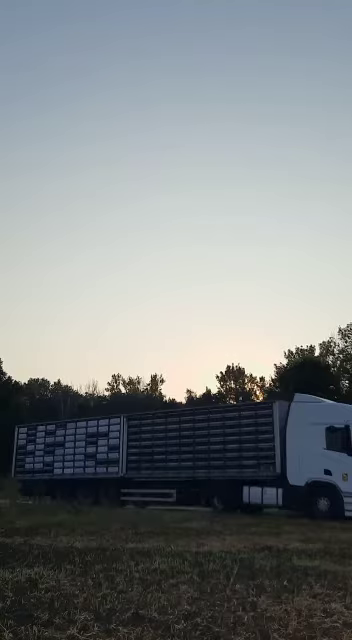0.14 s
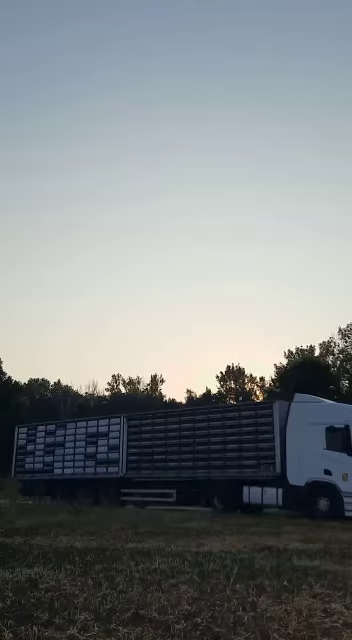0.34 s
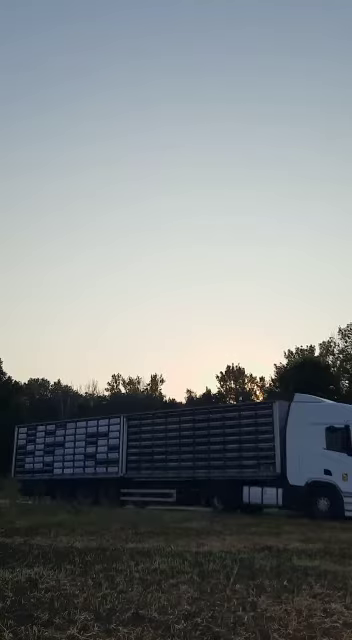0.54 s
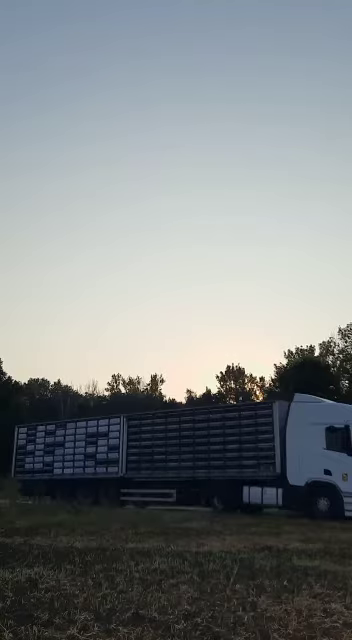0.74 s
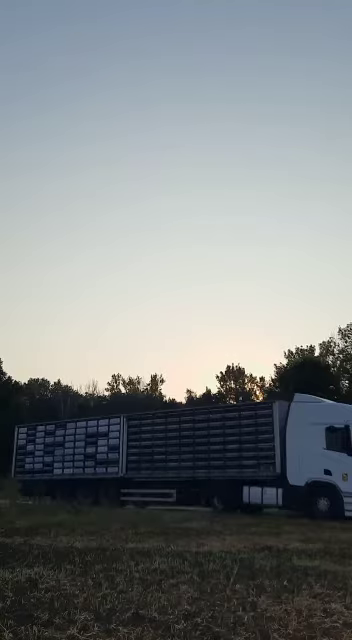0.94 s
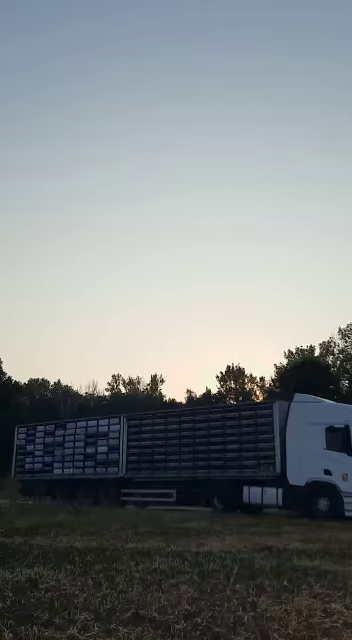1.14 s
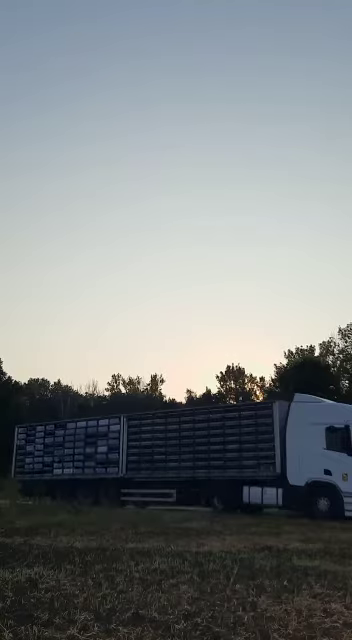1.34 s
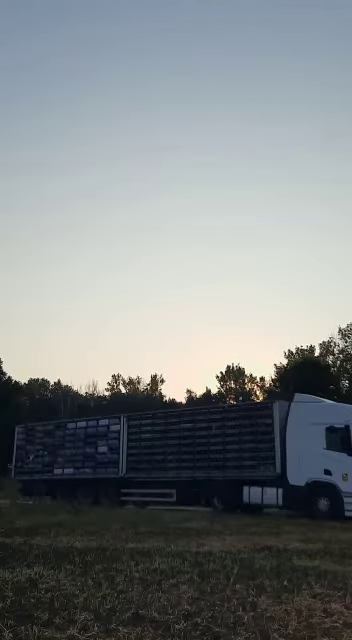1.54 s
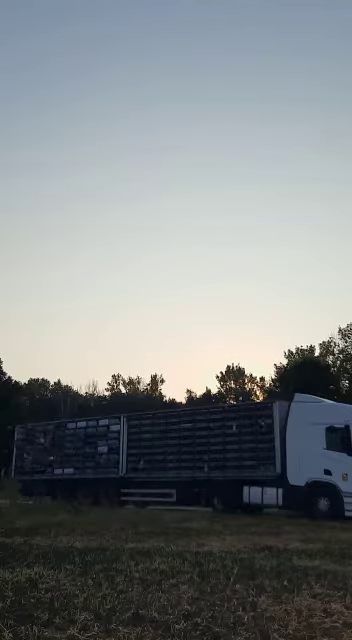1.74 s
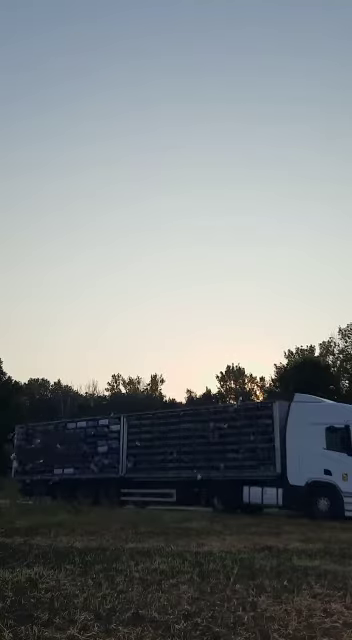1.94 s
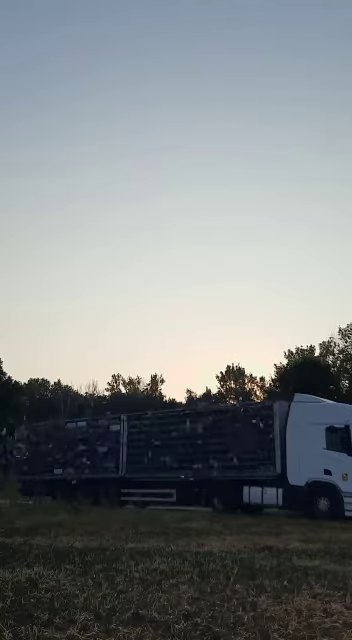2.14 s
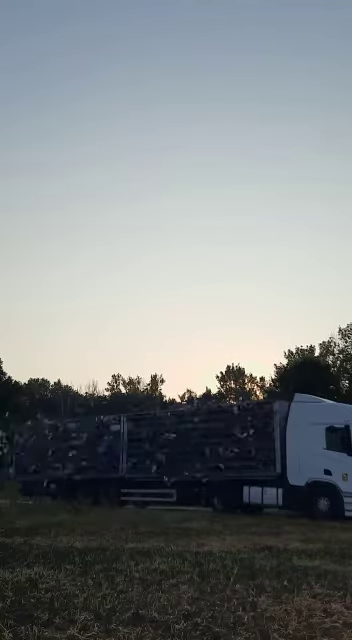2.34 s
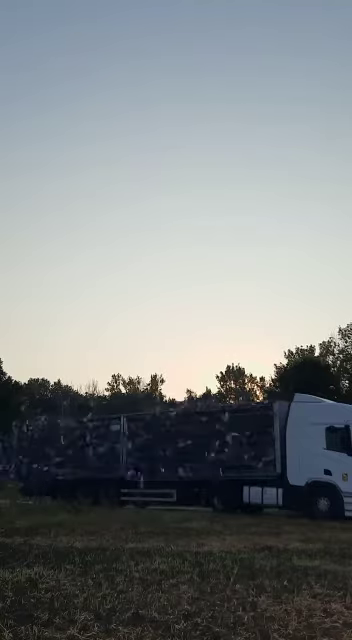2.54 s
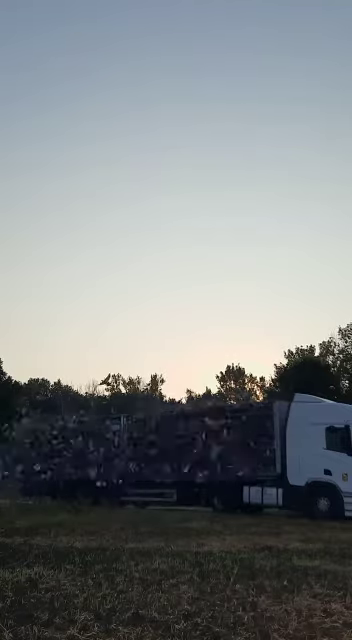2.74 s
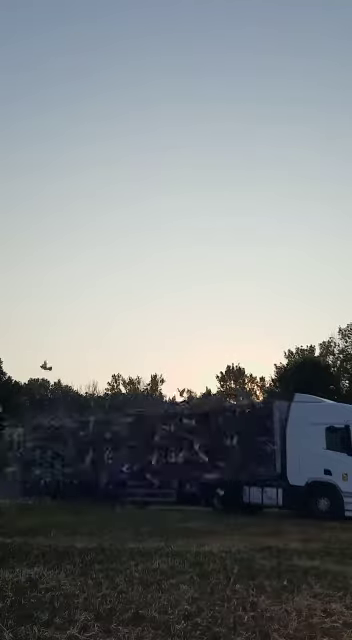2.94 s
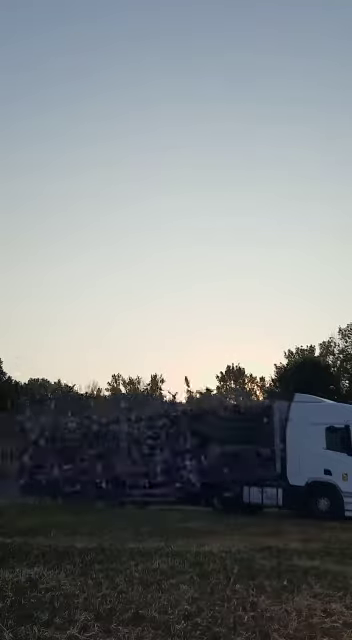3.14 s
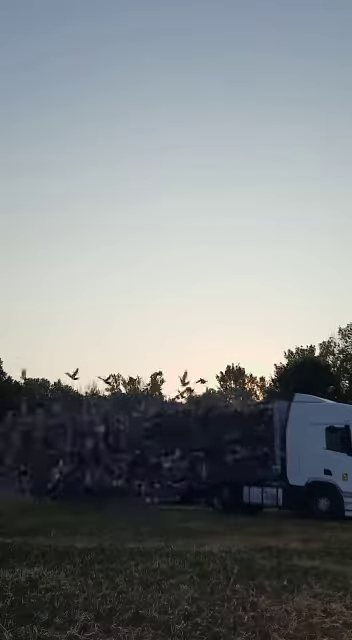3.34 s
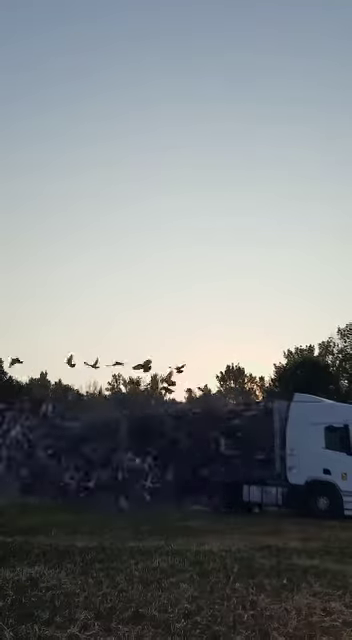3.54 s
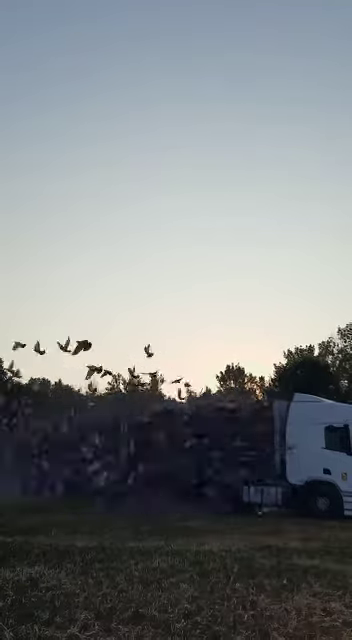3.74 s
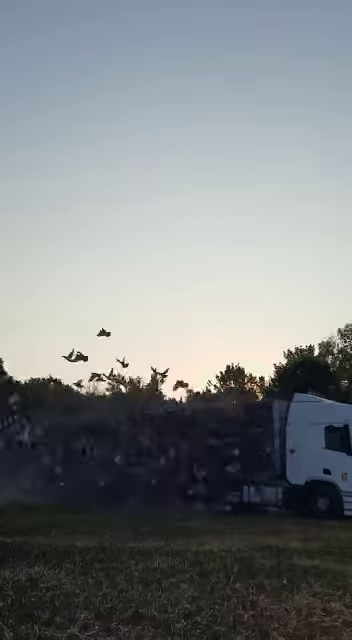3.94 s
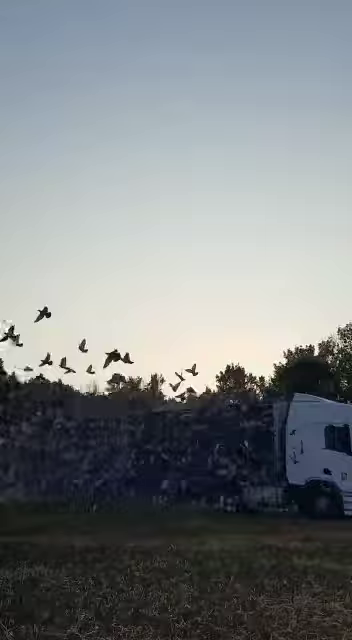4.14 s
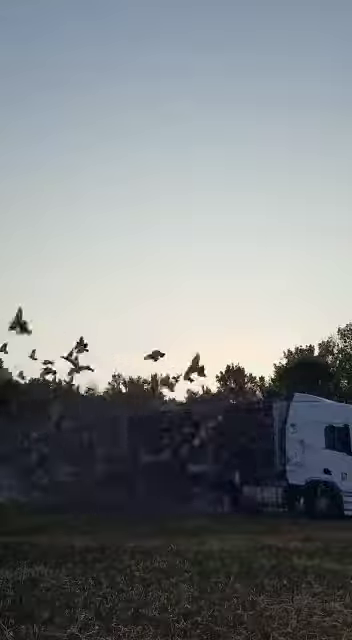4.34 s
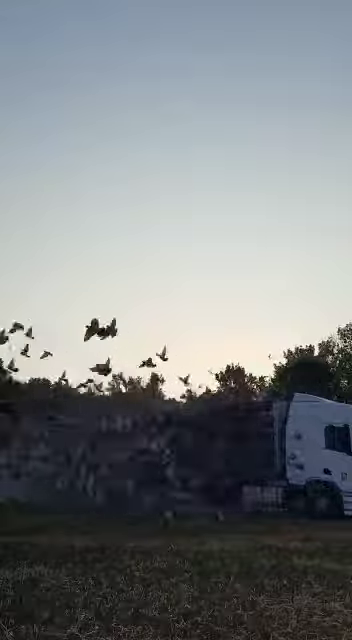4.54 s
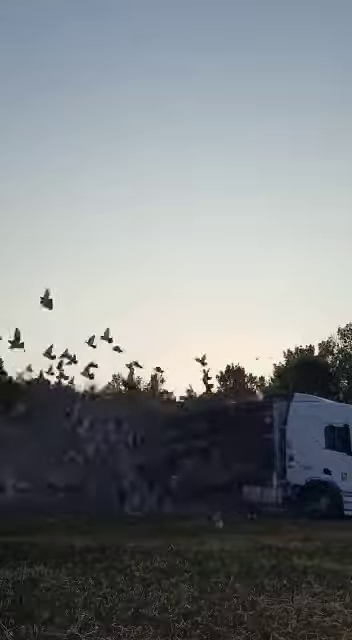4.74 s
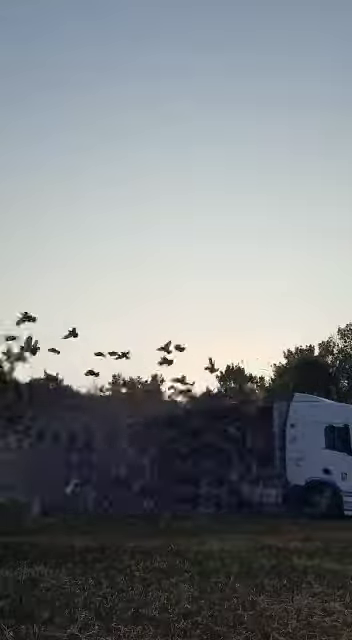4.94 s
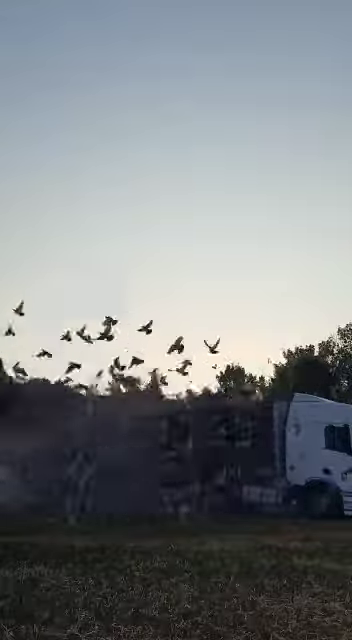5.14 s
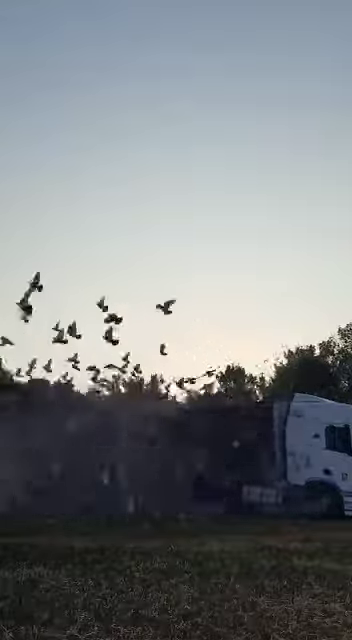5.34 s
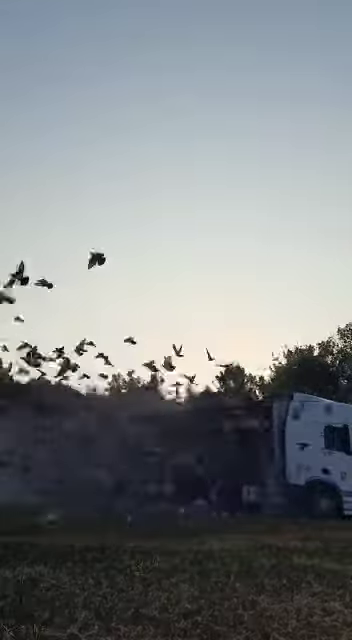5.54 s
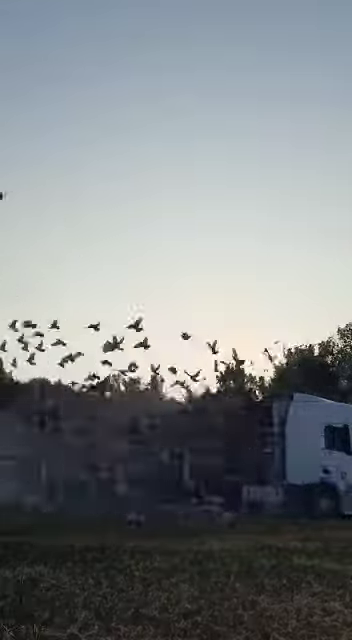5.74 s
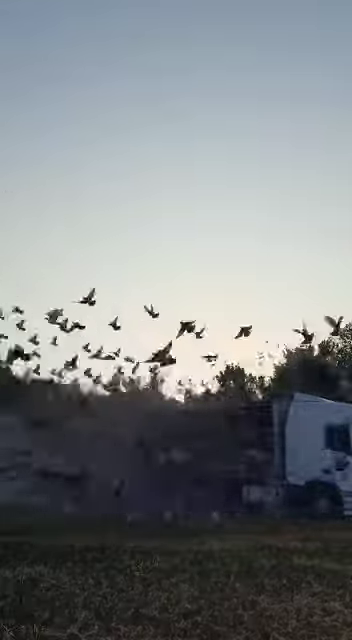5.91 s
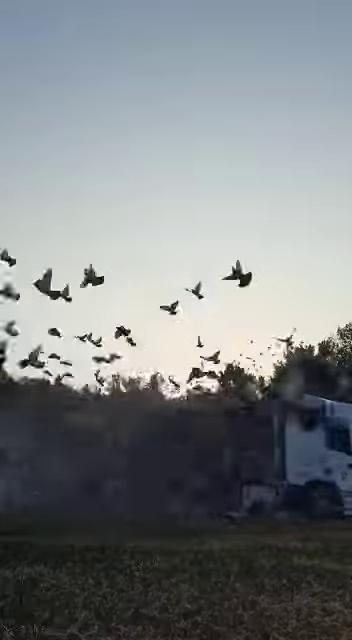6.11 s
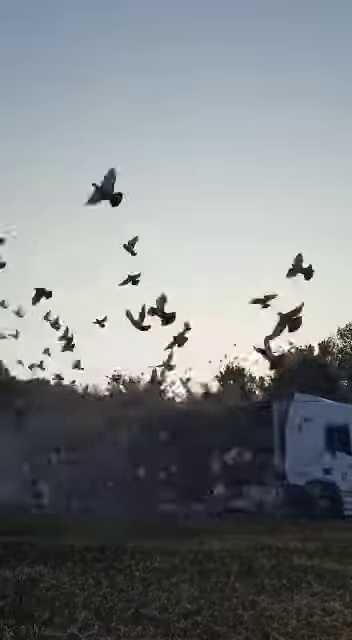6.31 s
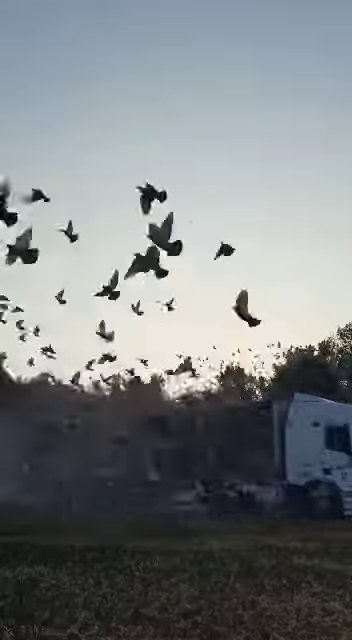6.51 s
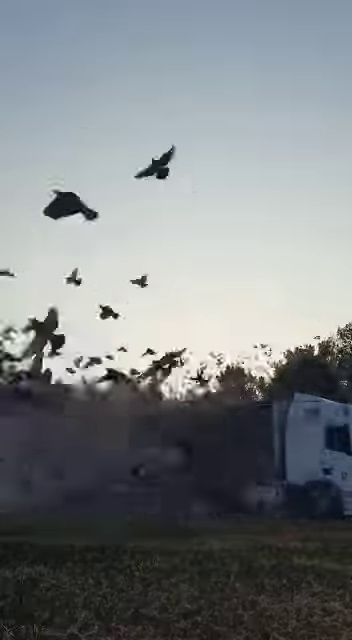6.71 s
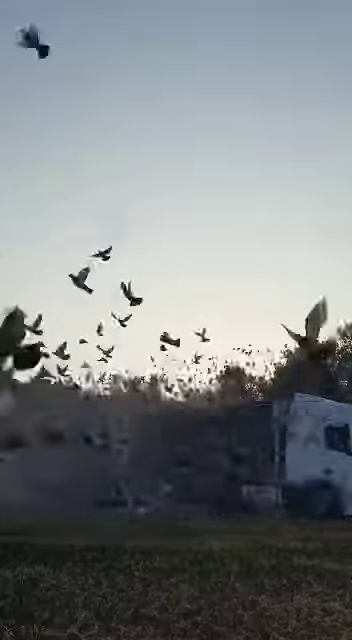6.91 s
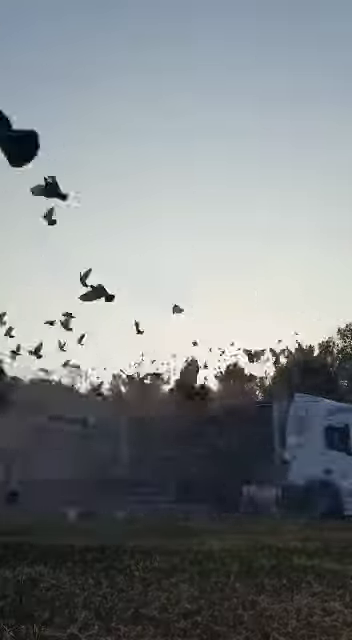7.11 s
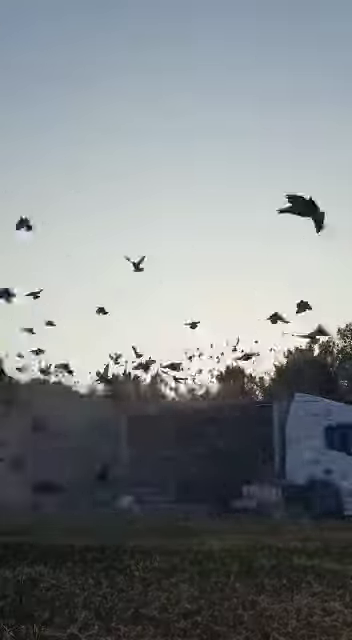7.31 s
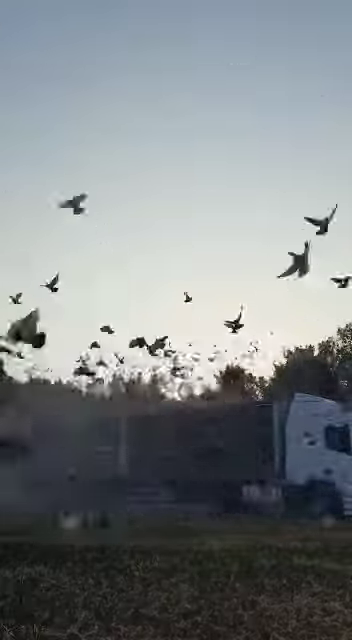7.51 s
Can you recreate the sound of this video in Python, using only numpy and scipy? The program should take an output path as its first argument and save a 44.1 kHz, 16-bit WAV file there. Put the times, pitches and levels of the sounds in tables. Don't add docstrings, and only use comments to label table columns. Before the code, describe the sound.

Thousands of pigeons burst from truck crates in an open field, clattering plastic doors giving way to a dense, rushing roar of wingbeats.

```python
import sys
import numpy as np
from scipy import signal
from scipy.fft import rfft, irfft, next_fast_len
from scipy.io import wavfile
from scipy.ndimage import uniform_filter1d

SR = 44100
rng = np.random.default_rng(int(sys.argv[2]) if len(sys.argv) > 2 else 0)


def materialize(psi):
    bounded = np.clip(np.atleast_2d(psi).T, -1, 1)
    quanta = np.round(bounded * 32767).astype(np.int16)
    wavfile.write(sys.argv[1], SR, quanta)


def voltage_ratio(decibels):
    exponent = np.asarray(decibels, float) / 20
    return 10 ** exponent


N = 338114

# (time [s], wing noise level [dB], closeness of the air push [dB])
FLOCK_PATH = [(0.0, -67, -4), (0.25, -67.5, -4), (0.72, -63.5, -4), (0.9, -59, -5), (1.15, -54, -5),
              (1.51, -46, -4), (1.67, -43, -6.5), (1.9, -42.5, -2.5), (2.05, -38, -3.5), (2.54, -38, -1),
              (3.27, -37, -.5), (4.23, -37.5, 0), (4.55, -39, 2.5), (5.3, -39, 1.5), (6.13, -40.5, 1.5),
              (6.9, -42.5, 0.5), (7.37, -44, 0), (7.67, -44.5, 3.5)]
# (frequency [Hz], level per Hz [dB])
THUMP_COLOUR = [(24, -62), (36, -24), (55, -1), (85, -1), (150, -5.5), (200, -11), (250, -22), (400, -43.5)]
FAR_THUMP_COLOUR = [(40, -40), (70, -8), (120, -0.5), (170, 5.5), (210, -4.5), (260, -9), (400, -47)]
DOWNWASH_COLOUR = [(120, -3), (190, -9.5), (250, -5.5), (310, 0.5), (420, -7), (600, -7), (1000, -63)]
WHOOSH_COLOUR = [(250, -50), (400, -5), (520, -3.5), (800, 0.5), (1300, -3.5), (2200, -9), (3500, -17),
                 (7000, -23)]
RUSTLE_COLOUR = [(700, -9), (2000, 2.5), (4000, 1.5), (8000, -1), (16000, -3)]
# (time [s], peak level [dB])
NEAR_SWEEPS = [(1.267, -35), (1.4326, -40), (1.5998, -33), (1.9215, -22.5), (2.0494, -31), (2.11, -28),
               (2.134, -19.5), (2.1994, -29), (2.3594, -25), (2.4538, -33), (3.0604, -25), (4.1994, -29),
               (5.0794, -25), (6.1994, -29), (6.4394, -30), (6.6403, -23.5)]
# (frequency [Hz], level per Hz [dB])
SWEEP_COLOUR = [(500, -7), (1000, -4), (1800, -5), (3000, -5), (5000, -20), (9000, -19)]
# (time [s], peak level [dB], low body re peak [dB], top re peak [dB])
CRATE_STRIKES = [(0.278, -43, 1, -24), (0.3436, -42.5, -3, -14), (0.4768, -48, -1, -10),
                 (0.579, -49, 1, -7), (0.8938, -42.5, 2, -8), (0.929, -43, -5, -11), (1.0405, -49, -2, 3),
                 (1.09, -43, 9, -14), (1.1598, -40, 2, -13), (1.268, -35.5, 2, -7),
                 (1.3213, -36.5, 8.5, -14), (1.372, -30, -14, -21), (1.4924, -29, -3, -14),
                 (1.6008, -22.5, -12, -14), (1.6925, -28, 2, -14), (1.802, -31, 2, -12),
                 (1.847, -29, -8, -13), (1.9222, -22.5, 1, -10), (2.0343, -25, -8, -6),
                 (2.053, -17.5, -8, -13), (2.136, -24, 2, -6), (2.361, -22, -8, -16),
                 (2.4258, -24.5, 9, -6), (2.4528, -23, 8, -7), (2.5805, -29.5, -9, -2),
                 (2.604, -27, -11, -11), (2.6407, -21, -3, -6.5)]
# (time [s], peak level [dB], low body re peak [dB])
OPEN_CLAPS = [(2.9854, -25, -1), (3.2786, -19.5, -19), (3.4097, -27, -8), (3.8931, -19, -11),
              (4.3575, -30, -10), (4.43, -26, -9), (4.504, -24, 3), (4.6763, -28, -7), (4.8498, -24, 2),
              (5.045, -22, 2), (5.153, -22.5, -5), (5.2703, -18.5, -14), (5.2937, -24, -3), (5.577, -27, 0),
              (5.7834, -28, -6), (5.965, -24.5, -8), (6.0317, -26, -12), (6.2537, -27, 1),
              (6.3475, -34, -9), (6.3774, -34, 1), (6.4373, -27, 4), (6.6386, -22, -6), (6.8728, -34, -8),
              (6.9176, -22, -8), (7.1232, -34, -5), (7.4859, -34, -8)]
# (frequency [Hz], level per Hz [dB])
CRACK_COLOUR = [(1200, -24), (2500, 1), (5000, -3), (8000, 0.5), (9000, 1.5), (10000, -40)]
TICK_COLOUR = [(8500, -40), (9700, 4.5), (13000, 1.5), (16000, -10)]
# (time [s], peak level [dB], pitch [Hz], decay by 60 dB [s])
DOOR_KNOCKS = [(1.076, -45, 754, .02), (1.2675, -29, 765, 0.021), (1.421, -34, 670, .02),
               (1.6006, -24, 800, 0.0063), (1.67, -33, 756, .02), (1.9223, -27, 750, 0.0084),
               (2.035, -24, 1090, .02), (2.102, -30, 905, .02), (2.113, -25, 1070, 0.022),
               (2.15, -28, 990, 0.022), (2.135, -19, 910, .012), (2.415, -21, 1050, 0.013),
               (2.454, -17.5, 930, 0.022), (2.729, -20.5, 990, 0.015), (3.16, -28, 770, .019)]
# (frequency [Hz], level per Hz [dB])
ROAD_COLOUR = [(25, -50), (42, -24), (53, -12), (64, -15), (110, -10), (180, -16), (257, -27), (383, -29.5),
               (604, -16.5), (1000, -17), (1630, -23), (3180, -40.5), (5010, -49), (15000, -57)]
# (frequency [Hz], left over right [dB])
PORT_BALANCE = [(190, 0.8), (450, 5), (1200, 2), (3500, 1.3), (5500, -2.5), (8000, -3.5), (9000, 5.5),
                (10500, 4), (14500, -0.5)]
# (frequency [Hz], likeness [0-1])
PORT_LIKENESS = [(200, 0.99), (500, 0.97), (1200, 0.83), (2200, 0.62), (3500, 0.34), (5500, 0.26),
                 (8000, 0.35), (8600, .2), (9100, 1), (9500, 1), (10000, 0), (15000, 0)]
# (frequency [Hz], lead of the left [rad])
PORT_LEAD = [(0, 0), (340, 0.0), (950, -0.8), (2840, -2.5), (6370, -4.0), (7580, -4.5), (8010, -5),
             (8960, -4), (9560, -11.5), (13900, -2.5), (15400, -21)]
# (frequency [Hz], level [dB])
OVERALL_COLOUR = [(4500, 0.5), (6500, 3), (7900, 6), (8500, 2), (9000, -6), (9550, -4.5), (9750, -7.5),
                  (12000, -1), (15500, -3.5)]
# (time [s], limit [Hz])
TREBLE_LIMIT = [(0, 13300), (.9, 14300), (1.8, 14200), (2.8, 15300), (3.6, 15470), (7.7, 16400)]
# (frequency [Hz], share of time in the sum [0-1], in the difference [0-1])
MUTED_BANDS = [(2480, .002, .001), (3370, .05, .002), (4270, 0.14, .003), (5640, .08, .003),
               (6500, .004, .003), (8440, .02, 0.028), (9360, .66, 1), (9900, .03, 0.16),
               (11850, .004, .01), (13300, .04, .03), (14200, .2, .1), (15500, .4, .25)]


def flock():
    t = np.arange(N) / SR
    wing_db, near_db = wings(t)
    mass_db = wing_db + 0.26 * t
    rustle = voltage_ratio(wing_db + 4.0)
    thump = voltage_ratio(mass_db + 5 + near_db)
    downwash = voltage_ratio(mass_db - 1.5 + 0.8 * near_db)
    whoosh = voltage_ratio(mass_db + 5 - 0.057 * near_db)

    beat = strokes(count=14)
    snap = snaps(per_s=300, spread_db=6.3, ms=0.6)
    slap = snaps(per_s=150, spread_db=4.8, ms=4.1)

    def mix(near, snappy, snap=slap):
        far = np.clip(1 - near - snappy, 0, 1)
        return np.sqrt(abs(far + near * beat + snappy * snap))

    airborne = np.clip((t - 0.55) / 0.6, 0, 1)
    close = np.clip((t - 1.1) / 1.64, 0, 1)
    feather_share = np.clip(0.16 - 0.0043 * t, 0, 1)
    return (air(airborne * np.sqrt(close) * thump * mix(0.17, 0.014, snap), THUMP_COLOUR)
            + air(voltage_ratio(-0.5) * airborne * np.sqrt(1 - close) * thump, FAR_THUMP_COLOUR)
            + air(airborne * downwash * mix(0.1, 0.034), DOWNWASH_COLOUR)
            + air(airborne * whoosh * mix(0.32, 0.054), WHOOSH_COLOUR)
            + air(rustle * mix(0.23, feather_share, snap), RUSTLE_COLOUR))


def wings(t):
    s, wing_db, near_db = np.transpose(FLOCK_PATH)
    return np.interp(t, s, wing_db), np.interp(t, s, near_db)


def strokes(count, beat_hz=9.0, sharp=3.9, near_db=4.0):
    step = 64
    t = np.arange(0, N, step) / SR
    power = np.zeros(len(t))
    for _ in range(count):
        pace_hz = beat_hz * rng.uniform(0.8, 1.2) * (1 + 0.0737 * drift(1.495, t))
        turns = np.cumsum(pace_hz) * step / SR + rng.random()
        nearness = voltage_ratio(near_db * drift(0.79, t)) ** 2
        power += nearness * np.exp(sharp * np.cos(2 * np.pi * turns))
    power /= uniform_filter1d(power, 400)
    return np.interp(np.arange(N) / SR, t, power)


def snaps(per_s, spread_db, ms):
    size = voltage_ratio(spread_db * np.minimum(rng.exponential(1, N), 3.3)) ** 2
    size = size * (rng.random(N) < per_s / SR)
    fade = np.exp(-np.arange(800) / SR * 1000 / ms)
    power = signal.oaconvolve(size, fade)[:N]
    return power / power.mean()


def sweeps():
    envelope = np.zeros(N)
    ms = np.arange(6000) / SR * 1000
    swell = (1 - np.exp(-ms / 0.81)) * np.exp(-ms / 14.3)
    for s, db in NEAR_SWEEPS:
        at = round(s * SR)
        envelope[at:at + len(ms)] += voltage_ratio(db) * swell
    return air(voltage_ratio(-4.0) * envelope, SWEEP_COLOUR)


def claps():
    top_db = -23
    events = list(map(tuple, CRATE_STRIKES))
    events += [tuple(row) + (top_db,) for row in OPEN_CLAPS]
    events += faint_claps(26, top_db)
    bursts = np.zeros((3, N))
    ms = np.arange(1300) / SR * 1000
    fade = np.exp(-ms * np.array([[-0.03], [0.01], [0.15]]))
    shape = (1 - np.exp(-ms / 0.1)) * np.exp(-ms / 1.76) * fade
    for s, db, body_db, tick_db in events:
        at = round(s * SR)
        gains = voltage_ratio(db + np.array([[body_db], [0], [tick_db]]))
        bursts[:, at:at + len(ms)] += gains * shape[:, :N - at]
    puff, crack, tick = bursts
    return (air(voltage_ratio(-4.5) * puff, WHOOSH_COLOUR)
            + air(voltage_ratio(-2.5) * crack, CRACK_COLOUR)
            + air(voltage_ratio(9.0) * tick, TICK_COLOUR))


def faint_claps(count, top_db):
    s = rng.random(count) * (N / SR)
    luck = rng.standard_normal((count, 2))
    db = wings(s)[0] + 8 + 1.5 * luck[:, 0]
    body_db = -5 + 2 * luck[:, 1]
    return list(zip(s, db, body_db, np.full(count, top_db)))


def knocks():
    out = np.zeros(N)
    t = np.arange(3000) / SR
    onset = 1 - np.exp(-t / 0.00036)
    for s, db, hz, t60 in DOOR_KNOCKS:
        ring = np.sin(2 * np.pi * hz * t) + 0.25 * np.sin(2 * np.pi * 1.03 * hz * t)
        decay = voltage_ratio(db + 1.5 - 60 * t / max(t60, 0.004))
        at = round(s * SR)
        out[at:at + len(t)] -= decay * ring * onset
    return np.array([out, np.roll(out, 9)])


def echoed(x):
    delay_ms, echo_db = 2.7, -5.5
    return x + voltage_ratio(echo_db) * np.roll(x, round(delay_ms * SR / 1000), axis=-1)


def road():
    t = np.arange(N) / SR
    hum_level = voltage_ratio(-56 + 1.5 * drift(2.7, t))
    hum_hz = 53.4 + 1.16 * drift(3.7, t)
    hum = hum_level * np.sin(2 * np.pi * np.cumsum(hum_hz) / SR)
    traffic = air(voltage_ratio(-49 + 0.4 * drift(3.0, t)), ROAD_COLOUR)
    return traffic + np.sqrt(2) * hum


def air(envelope, points):
    hz = np.fft.rfftfreq(8192, 1 / SR)
    norm = np.sqrt(np.mean(voltage_ratio(read(points, hz)) ** 2))
    noise = envelope * rng.standard_normal((2, N))
    return filtered(noise, lambda f: voltage_ratio(read(points, f)) / norm)


def drift(top_hz, t):
    f = np.geomspace(top_hz / 8, top_hz, 12)[:, None]
    waves = np.sin(2 * np.pi * (f * t + rng.random(f.shape)))
    return evened(np.sum(waves / np.sqrt(f), axis=0))


def read(points, hz):
    f, value = np.transpose(points)
    return np.interp(np.log(hz + 1), np.log(f + 1), value)


def evened(x):
    return x / np.sqrt(np.mean(x ** 2) + 1e-20)


def filtered(x, response):
    size = next_fast_len(N + 4096)
    return irfft(rfft(x, size) * response(np.fft.rfftfreq(size, 1 / SR)), size)[..., :N]


def scene():
    common, apart = flock() + echoed(claps() + knocks()) + sweeps() + road()
    lead_hz, lead = np.transpose(PORT_LEAD)

    def same(f):
        return np.clip(read(PORT_LIKENESS, f), 0, 1)

    def left_response(f):
        return voltage_ratio(read(PORT_BALANCE, f) / 2) * np.exp(1j * np.interp(f, lead_hz, lead))

    other = filtered(common, same) + filtered(apart, lambda f: np.sqrt(1 - same(f) ** 2))
    left = filtered(other, left_response)
    right = filtered(common, lambda f: voltage_ratio(-read(PORT_BALANCE, f) / 2))
    return np.array([left, right])


def band_muting(x, lift_hz=650.0, wobble_hz=520.0):
    shift = 1024 - 617
    pair = np.pad([x[0] + x[1], x[0] - x[1]], ((0, 0), (shift, 0)))
    hz, t, z = signal.stft(pair, SR, "cosine", 2048, 1024)
    line = np.arange(len(hz))
    wide = np.where(line < 320, 16, 32)
    first = line // wide * wide
    centre_hz = (hz[1] * (first + wide / 2))[:, None]

    treble_db = 10 * np.log10(np.mean(abs(z[:, hz > 10000]) ** 2, axis=(0, 1)) + 1e-20)
    rise_db = treble_db - uniform_filter1d(treble_db, size=9)
    luck = evened(uniform_filter1d(rng.standard_normal((3, len(hz), len(t))), size=2, axis=2))
    limit_hz = np.interp(t, *np.transpose(TREBLE_LIMIT)) + lift_hz * rise_db + wobble_hz * luck[2, 0]
    above = centre_hz > limit_hz + np.array([0, 700.0])[:, None, None]

    rank = 0.5 + 0.5 * np.tanh(0.85 * luck[:2, first])
    ease = np.clip(1.25 - 0.09 * t, 0, 2) ** 2
    middle = np.clip(t / 1.6, 0.1, 1) * ease
    upper = np.where(centre_hz < 10500, 1.08, ease)
    busy = np.where(centre_hz < 7000, middle, upper)
    f, *shares = np.transpose(MUTED_BANDS)
    share = np.array([np.interp(centre_hz, f, s) for s in shares])
    empty = rank < busy * share

    z[empty | above | (hz > 15850)[:, None]] = 0
    both, differ = signal.istft(z, SR, "cosine", 2048, 1024)[1][:, shift:shift + N]
    return np.array([both + differ, both - differ]) / 2


def band_limit(x):
    return signal.sosfilt(signal.butter(12, 15840, fs=SR, output="sos"), x)


def record(dry):
    ported = filtered(dry, lambda f: voltage_ratio(read(OVERALL_COLOUR, f)))
    return band_limit(band_muting(ported))


dry = scene()
out = record(dry)
materialize(out)
```